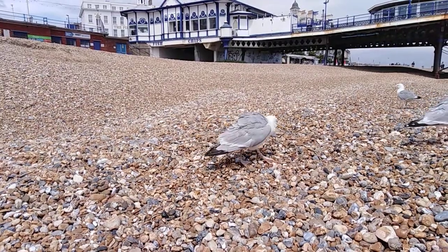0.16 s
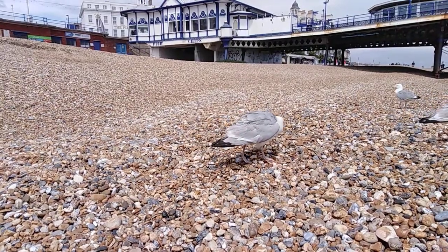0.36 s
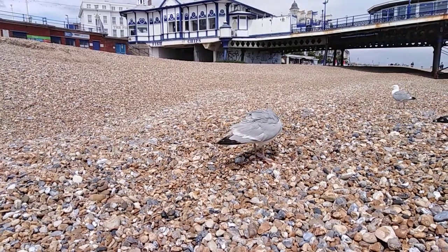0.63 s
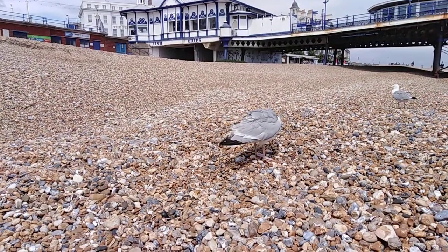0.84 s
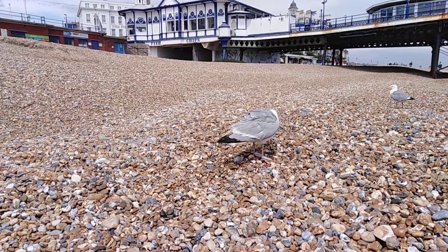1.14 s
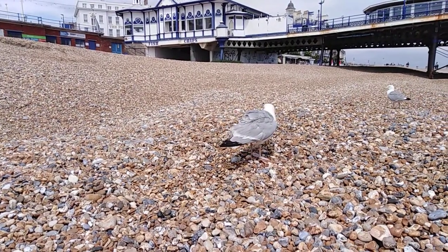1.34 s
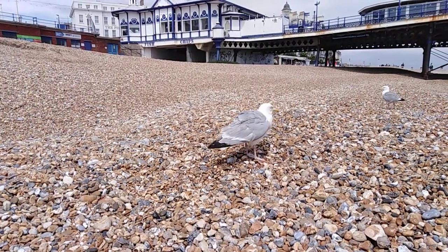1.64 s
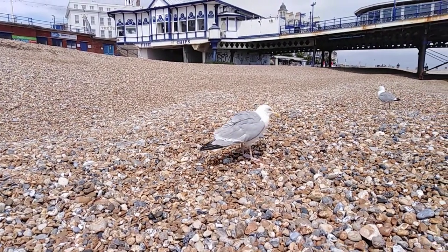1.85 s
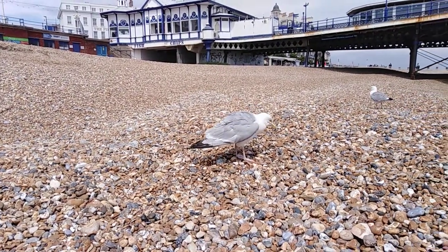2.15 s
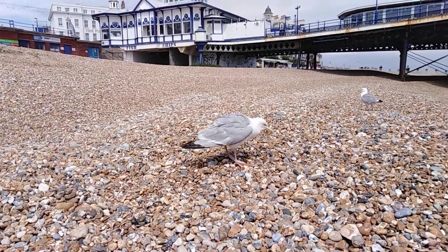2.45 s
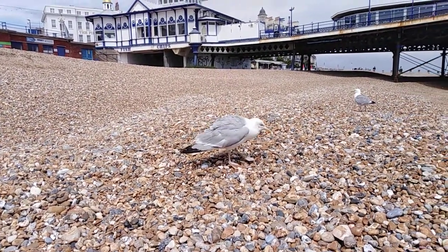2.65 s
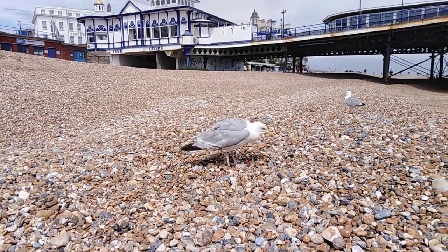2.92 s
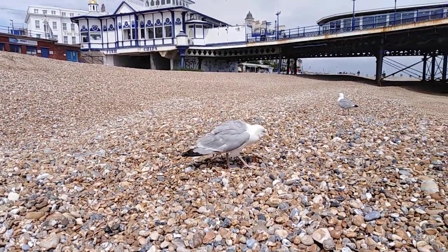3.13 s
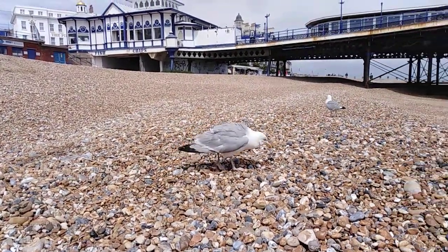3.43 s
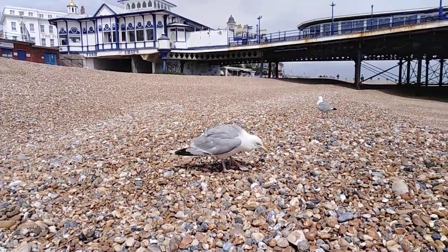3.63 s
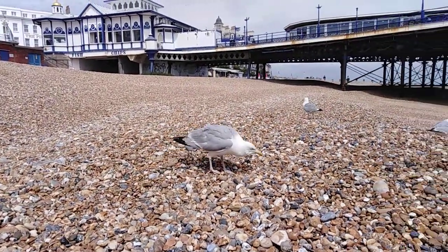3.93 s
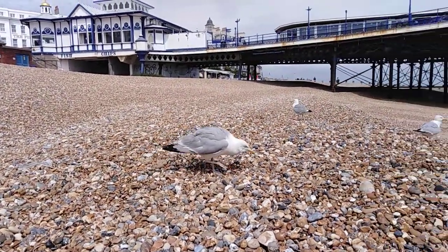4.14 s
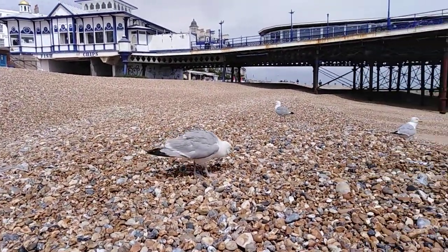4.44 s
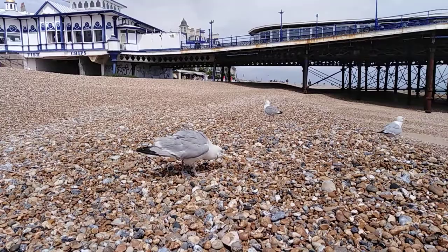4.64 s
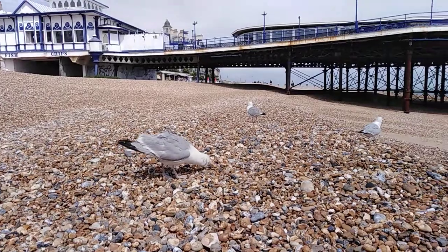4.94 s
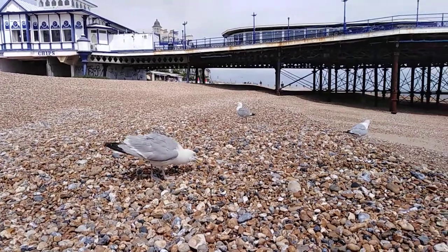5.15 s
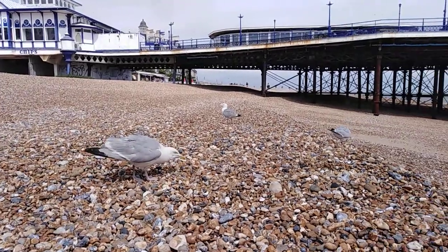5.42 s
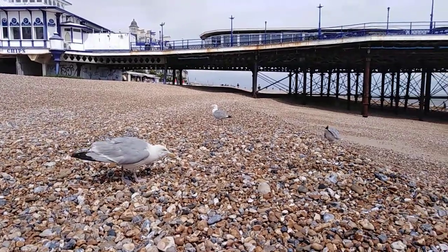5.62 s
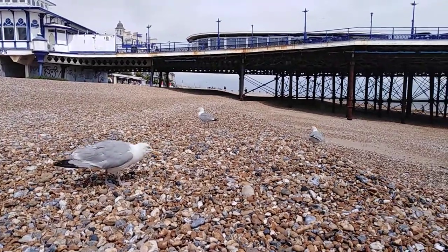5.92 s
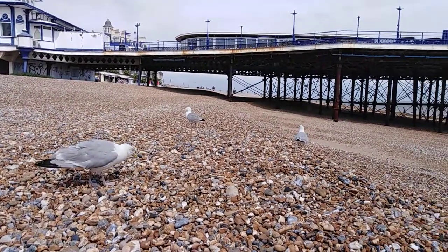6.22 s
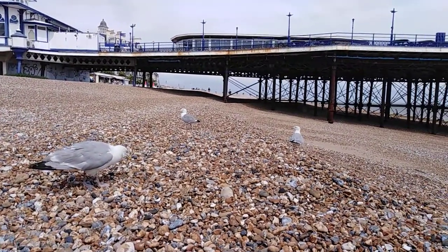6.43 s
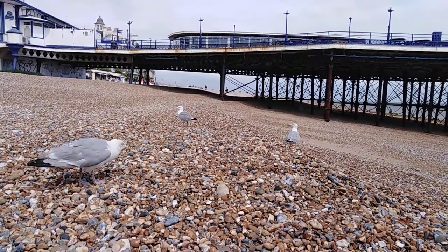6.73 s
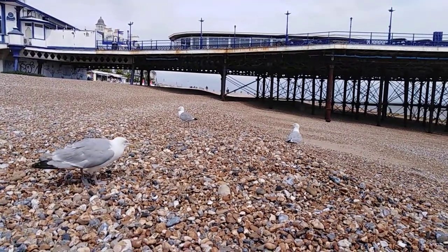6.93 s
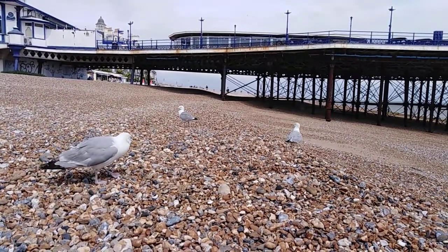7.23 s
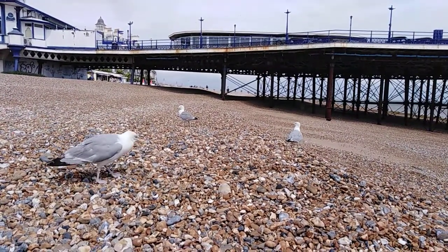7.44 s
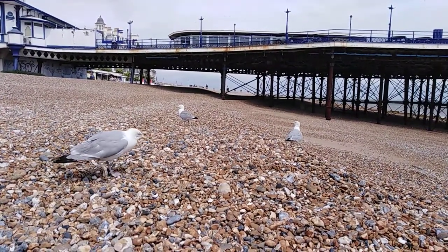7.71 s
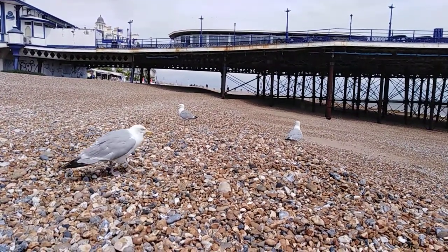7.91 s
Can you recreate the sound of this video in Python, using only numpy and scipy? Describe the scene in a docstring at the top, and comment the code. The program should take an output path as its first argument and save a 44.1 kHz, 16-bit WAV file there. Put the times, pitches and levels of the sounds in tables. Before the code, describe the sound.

Close stereo microphone on an open pebble beach. Wind rumble swells around one second and again past five, first on both sides, then mostly left. A shrill gull squeal breaks upward and slides down at the start, with two quieter returns. Distant mews give way to short rhythmic yelps. Dry stone knocks and small crunches punctuate a soft, even wash of surf.

```python
"""Gulls on a shingle beach

Two microphone ports on the shingle: a young gull whistles three times, a voice leaping between held pitches.
Far adults mew and yelp in harmonics; pebbles close by knock (ringing bursts) and crunch (dense grains).
Distant surf is filtered noise in slow swells; gusts are low rumble, with strong eddies, each placed at one port.
The left port hears the whistle, mews, surf and crunch a fraction of a millisecond after the right.
"""
import sys
import numpy as np
from scipy import signal
from scipy.fft import rfft, irfft, next_fast_len
from scipy.io import wavfile
from scipy.ndimage import uniform_filter1d

SR = 44100
rng = np.random.default_rng(int(sys.argv[2]) if len(sys.argv) > 2 else 0)


def how_loud(loudness_db):
    """Turn decibels into a plain amplitude multiplier (0 dB gives 1, 20 dB gives 10)."""
    steps = np.asarray(loudness_db, float) / 20
    return 10 ** steps


def wrap_up_sound(samples):
    """Save the sound to the file named by the first command line argument, as 16-bit audio."""
    columns = np.atleast_2d(samples).T
    # keep every value between -1 and 1, then stretch to whole-number steps
    tamed = np.clip(columns, -1, 1)
    steps = np.round(tamed * 32767).astype(np.int16)
    wavfile.write(sys.argv[1], SR, steps)


N = 355887

# Levels of the sources are those ahead of the port balance and the microphone.
# Young gull: one list a whistle, one row a step between windpipe resonances
# (start t/s, first f/Hz, last f/Hz, first level/dB, last level/dB)
WHISTLE_STEPS = [
    [(.314, 3430, 3167, -37.5, -44), (.35, 4100, 3995, -33.5, -56.5), (.402, 5060, 5320, -27.5, -31),
     (.426, 5655, 5510, -31.5, -38.5), (.556, 5150, 4920, -28, -38.5), (.716, 4365, 4130, -30.5, -48),
     (.822, 3640, 3390, -45.5, -54.5), (.854, 2890, 2940, -47, -76)],
    [(3.612, 4590, 4650, -45, -56.5), (3.674, 5200, 5410, -41, -42), (3.71, 5400, 4950, -46, -47.5),
     (3.94, 4610, 4380, -46, -60)],
    [(6.02, 2950, 2927, -53, -52.5), (6.038, 3646, 3360, -48.5, -52), (6.058, 3403, 3344, -50, -57),
     (6.088, 4260, 4240, -50.5, -54), (6.124, 5280, 5470, -41, -66), (6.156, 5780, 5590, -45.5, -56),
     (6.214, 5260, 4980, -42.5, -58), (6.378, 4480, 4230, -42, -47), (6.508, 4200, 3960, -55, -61)],
]
# End of each whistle (t/s)
WHISTLE_ENDS = [.874, 4.045, 6.54]
# Level shimmer of each whistle in gusty air (rms/dB)
WHISTLE_SHIMMER = [1.8, 5, 2.8]
# Overtones of the whistle, relative to the fundamental (f/Hz, level/dB)
WINDPIPE = [(6000, -15), (6700, -19.5), (8100, -12.5), (8700, -53), (10200, -35.5), (11300, -26),
            (12100, -45), (13000, -30), (15000, -68)]
# Hoarse second voice under the high notes, one list a whistle (t/s, f/Hz, level/dB)
HOARSE_VOICE = [
    [(.418, 4500, -51), (.45, 4800, -52), (.51, 4740, -55), (.53, 4630, -51), (.6, 4410, -52.5),
     (.675, 4190, -56.5), (.71, 4070, -59)],
    [(3.61, 4050, -60), (3.68, 4260, -58)],
    [(6.158, 4750, -65), (6.175, 4800, -60), (6.21, 4620, -67), (6.25, 4300, -62), (6.3, 4410, -59),
     (6.345, 4280, -62), (6.38, 4000, -60)],
]
# Broken squeaks of the second voice near the start of a whistle (t/s, f/Hz, level/dB)
SQUEAKS = [
    [(.305, 4200, -54), (.322, 4640, -46.5)],
    [(.33, 4940, -47), (.352, 4880, -45)],
    [(.375, 4700, -46.5), (.405, 4600, -38)],
    [(.403, 4310, -41.5), (.42, 4500, -44)],
    [(.39, 4950, -52), (.405, 5050, -52)],
    [(6.075, 4600, -64), (6.1, 4500, -63)],
    [(6.095, 4600, -64), (6.128, 5100, -47)],
    [(6.125, 4460, -50.5), (6.16, 4700, -65)],
]
# Colour of the whistle's echoes, duller than the voice (f/Hz, level/dB)
ECHO_COLOUR = [(4400, -18), (5800, -22)]
JUMP_S, SLIDE_S = 0.0029, 0.018  # time from one step to the next: a break, or a slide down
SLIDE_ABOVE_DB = -43  # a step must end louder than this to slide
SAG_POWER, SWELL_S, SWELL_DB = 1.4, 0.018, -6  # bend of the pitch; each step swells in from SWELL_DB
BEAT_DB = -8.5  # rough strand relative to the hoarse voice

# Far gulls: long mews, one list a mew (t/s, f/Hz, level/dB)
FAR_MEWS = [
    [(.5, 1117, -60.5), (.58, 1012, -59), (.64, 894, -61.5)],
    [(1.33, 1288, -61), (1.38, 1254, -56.5), (1.6, 1258, -60), (1.65, 1235, -72), (1.674, 1150, -61),
     (1.78, 1126, -70)],
    [(2.04, 1291, -59.5), (2.1, 1271, -59.5), (2.364, 1296, -56.5), (2.452, 1120, -67), (2.5, 1055, -72)],
]
# Throat of a mewing gull, shaping its harmonics (f/Hz, level/dB)
MEW_THROAT = [(1300, 0), (2500, -3), (3100, -30), (3500, 2), (3780, -14), (3880, -32)]
# Far string of short falling yelps (t/s, level/dB, f/Hz)
FAR_YELPS = [(2.42, -70, 1188), (2.86, -65.5, 1134), (2.961, -55.5, 1094), (3.119, -76, 1090),
             (3.222, -60.5, 1054), (3.35, -66, 1086), (3.467, -63, 1100), (3.62, -71, 1110),
             (3.753, -64, 1136), (3.897, -78, 1080), (4.038, -59.5, 1096), (4.211, -80, 1070),
             (4.32, -55.5, 1112), (4.469, -62.5, 1143), (4.617, -60.5, 1155), (4.852, -58, 1125),
             (4.957, -60, 1109)]
# Harmonics 1 to 3 of a yelp (level/dB)
YELP_HARMONICS = [-1, -27, -4.5]
MEW_LEAD_MS = 0.18  # the mews come from further left than the surf

# Pebbles knocked together (t/s, peak level/dB, left-right level/dB)
KNOCKS = [(0.1958, -39.5, -24), (1.032, -40.5, -17), (1.1897, -21.5, 8), (2.6034, -32.5, -7),
          (2.7567, -39, -8), (2.8583, -39, -13), (2.883, -37, -10), (2.9125, -29.5, -11),
          (3.059, -36.5, -14), (3.457, -22, -10), (3.6034, -31, 13), (3.8199, -42, -14), (3.981, -32, -19),
          (4.151, -35, -15), (4.2808, -39.5, -14), (4.402, -49, -22), (4.559, -29, -13), (4.5865, -30, 4),
          (4.728, -45, -3), (4.754, -46.5, -26), (4.833, -38.5, -18), (4.884, -33.5, -16),
          (4.9578, -38, -14), (5.0233, -35.5, -6), (5.064, -37, -10), (5.14, -39, -4), (5.284, -31, -13),
          (5.816, -46.5, -22.5), (5.8608, -30.5, -14), (6.534, -49, -4), (6.5998, -41.5, -25),
          (6.7488, -29.5, -2), (6.753, -42, -2), (6.764, -34, -8), (6.776, -48, -4), (6.867, -36.5, -6),
          (6.957, -34, -12.5), (7.2525, -43, -18), (7.3694, -36.5, -12), (7.8182, -37, -5.5)]
# Feet shifting the shingle (t/s, level/dB, length/s)
SHUFFLES = [(0.244, -68.5, 0.19), (0.628, -68.5, 0.11), (2.91, -56, 0.11), (3.43, -81, .05),
            (3.554, -65, 0.32), (3.839, -48.5, 0.048), (3.905, -48.5, 0.058), (4.043, -55, 0.12),
            (4.194, -66, 0.11), (4.42, -58.5, 0.084), (4.595, -52.5, 0.077), (5.02, -69, 0.4),
            (5.898, -70, 0.25), (6.278, -70.5, 0.16), (6.604, -63.5, 0.17), (6.764, -68.5, 0.09),
            (7.345, -72, .15), (7.832, -62, 0.038)]
# Colour of stone on stone (f/Hz, level/dB)
STONE = [(2500, -18), (4000, -8.5), (5500, -5.5), (7000, -10.5), (10000, -6), (13000, -6.5), (14300, -14.5),
         (15300, -49)]
RATTLE_DB, RATTLE_GROWTH = -54, 0.4  # rattle of a -36 dB knock; dB of rattle per dB of knock
BOUNCE_S, BOUNCE_DB = 0.008, -16.5  # scale of the bounce waits; mean level of a bounce under its knock
SETTLING_DB, SHUFFLE_RISE = -80, 0.65  # shingle at rest; rise time as a share of the length

# Distant surf (t/s, wash level/dB, fizz level/dB, level/dB of the surf's middle band, 1.4 to 1.7 kHz)
SURF_LEVELS = [(0, -56.5, -67, -84), (.5, -57, -73, -92.5), (1.0, -57.5, -71, -88), (1.4, -58, -67.5, -95),
               (2.2, -57, -68, -81), (2.55, -56, -66, -90), (2.85, -56, -67.5, -77), (3.2, -54, -64.5, -90),
               (4.1, -55, -67.5, -69.5), (4.5, -56, -71, -67.5), (5.2, -56, -70.5, -66.5),
               (5.55, -56.5, -68, -63.5), (5.9, -57, -71.5, -64.5), (6.35, -57, -67, -64.5),
               (6.6, -56.5, -72.5, -66), (7.2, -56.5, -67.5, -62.5), (8.07, -56, -71.5, -64.5)]
# Density of each surf layer when its level is 0 (f/Hz, level/dB per Hz)
WASH_COLOUR = [(25, -29), (50, -18), (90, -17), (140, -15), (250, -17.5), (500, -23), (900, -26.5),
               (1250, -28), (1450, -30.5), (1900, -28.5), (2550, -30), (2900, -31.5), (5500, -40),
               (14000, -56)]
FIZZ_COLOUR = [(2900, -56.5), (3200, -21), (3450, -23), (3750, -30), (4300, -26.5), (4900, -29),
               (5500, -39.5), (8000, -53.5)]
MIDDLE_COLOUR = [(1150, -51.5), (1400, -20.5), (1650, -22.5), (1850, -44.5)]

# Slow rise and fall of the wind rumble (t/s, left level/dB, right level/dB)
GUSTS = [(0, -69, -50), (.5, -55, -39), (.8, -44.5, -47.5), (1.05, -38.5, -35.5), (1.6, -50, -41),
         (2.0, -49.5, -51), (2.6, -54, -54.5), (3.2, -72, -56.5), (3.75, -63, -58), (4.3, -64.5, -53.5),
         (4.75, -58, -39), (5.0, -43, -46), (5.25, -49.5, -35.5), (5.75, -34, -44), (6.0, -37.5, -53.5),
         (6.25, -51.5, -44.5), (6.7, -72, -58), (7.15, -64, -78), (7.5, -79, -44.5), (8.07, -82, -55)]
# Strongest eddies (t/s, level/dB, length/s, port: 0 left, 1 right)
BUFFETS = [(0.022, -33.5, 0.05, 1), (0.373, -33, 0.012, 1), (0.624, -33.5, 0.027, 0),
           (0.802, -33.5, 0.011, 1), (0.903, -31, 0.035, 1), (0.96, -26, 0.012, 1),
           (1.046, -23.5, 0.015, 1), (1.077, -23.5, 0.035, 0), (1.132, -27, 0.028, 0),
           (1.217, -33.5, 0.021, 0), (1.282, -33, .055, 1), (1.286, -32, 0.03, 0), (1.361, -33.5, 0.027, 0),
           (1.402, -33, 0.025, 1), (1.744, -36, 0.028, 1), (1.884, -36, 0.041, 1), (2.211, -34, 0.014, 1),
           (2.389, -32, 0.075, 1), (2.471, -31.5, 0.0069, 0), (2.474, -31, 0.032, 1),
           (4.391, -38.5, 0.034, 0), (4.735, -40, 0.079, 1), (4.964, -20.5, 0.029, 0),
           (5.069, -25.5, 0.055, 0), (5.153, -25.5, 0.02, 0), (5.259, -33, 0.03, 1), (5.354, -23, 0.089, 0),
           (5.508, -19.5, 0.0069, 0), (5.554, -30, 0.056, 0), (5.916, -26, 0.014, 0),
           (5.964, -29.5, 0.016, 0), (6.112, -34, 0.066, 0), (6.183, -33, 0.073, 1), (6.235, -32, 0.11, 0),
           (6.312, -34.5, 0.018, 0), (6.462, -38, 0.12, 0)]
# Spectral shape of the rumble (f/Hz, level/dB)
EDDY_COLOUR = [(25, -39), (50, -9), (80, 9.5), (130, 2), (200, -2.5), (350, -24.5), (600, -36.5),
               (1200, -37.5)]
# Spectral shape of the sharper edge of strong eddies (f/Hz, level/dB)
GUST_EDGE = [(60, -36), (150, 3), (250, -5.5), (450, -13.5), (800, -30), (1500, -42)]

# Likeness of left and right in spread sounds (f/Hz, share)
LIKENESS = [(100, 1), (300, 1), (600, 1), (1400, 0.6), (2500, 0.73), (4500, 0.16), (9000, 0.018)]
# Time by which the left port follows the right (f/Hz, lag/ms)
PORT_LAG = [(130, 0.09), (300, 0.37), (600, 0.32), (1400, 0.34), (2500, 0.4646)]
# Balance of the ports (f/Hz, left-right level/dB)
PORT_LEAN = [(200, 0.5), (1000, -0.5), (1900, 4.5), (2700, 0.5), (4300, 5.5), (6500, 2.5), (10000, -8),
             (14000, -4.5)]
# Bass cut of the microphone (f/Hz, level/dB)
BASS_CUT = [(20, -36), (40, -9.5), (60, -0.5), (90, 0.5)]
# Level under which a narrow band drops away (f/Hz, level/dB)
DROP_LEVEL = [(200, -116), (1000, -73), (1450, -70.5), (2200, -74), (3100, -72), (3800, -74), (4500, -77.5),
              (5200, -78), (6500, -82), (8000, -84.5), (10000, -85), (14000, -89.5)]
# Gain of a dropped band that no loud neighbour masks (f/Hz, level/dB)
DROP_GAIN = [(900, -21), (1450, -25), (2200, -21), (3050, -33), (3400, -24), (3800, -30), (4400, -18),
             (5000, -19), (5600, -26), (7000, -20)]


def young_gull():
    """A clean whistle, stronger at the left port; a weaker hoarse voice under it makes the high notes rough."""
    whistles = [stairs(steps, end) for steps, end in zip(WHISTLE_STEPS, WHISTLE_ENDS)]
    clean = sum(tone(w, lambda k, hz: read(WINDPIPE, hz) * (k > 1), jitter=0.0022, shimmer_db=db)
                for w, db in zip(whistles, WHISTLE_SHIMMER))
    hoarse = sum(strand(h, jitter=0.0099, shimmer_db=2.5) for h in HOARSE_VOICE)
    # only the first and third whistles beat
    beats = sum(strand(beat_rows(w, h), jitter=0.044, shimmer_db=3.5)
                for w, h in zip(whistles[::2], HOARSE_VOICE[::2]))
    squeaks = sum(strand(s, jitter=0.014, shimmer_db=2) for s in SQUEAKS)
    voice = clean + hoarse + beats + squeaks
    direct = ports(voice, 0 * voice, np.ones_like) * how_loud([[1.5], [-2.5]])
    return direct + scatter(colour(voice, ECHO_COLOUR), t60=0.33)


def stairs(steps, end):
    """Turns steps into a pitch and level curve: swell in, bend (mostly a quickening sag), break or slide."""
    stops = []
    for step, following in zip(steps, steps[1:]):
        slides = following[1] < step[2] and step[4] > SLIDE_ABOVE_DB
        stops.append(following[0] - (SLIDE_S if slides else JUMP_S))
    rows = []
    for (s, hz, last_hz, db, last_db), stop in zip(steps, stops + [end]):
        u = np.linspace(0, 1, num=9)
        bend = u ** SAG_POWER if last_hz < hz else 1 - (1 - u) ** SAG_POWER
        swell_db = SWELL_DB * np.exp(-u * (stop - s) / SWELL_S)
        rows += zip(s + u * (stop - s), hz + (last_hz - hz) * bend, db + (last_db - db) * u + swell_db)
    return rows


def beat_rows(whistle, hoarse):
    """Two voices beat: a strand lies as many Hz under the hoarse voice as that lies under the whistle."""
    s, whistle_hz = np.transpose(whistle)[:2]
    return [(t, 2 * hz - np.interp(t, s, whistle_hz), db + BEAT_DB) for t, hz, db in hoarse]


def strand(rows, jitter, shimmer_db):
    """A voice of one partial, without overtones."""
    return tone(rows, lambda k, hz: 0, jitter, count=1, shimmer_db=shimmer_db)


def tone(rows, harmonic_db, jitter, count=3, shimmer_db=1.6):
    """Harmonics on a pitch curve, slightly unsteady; the voice breaks off where the pitch leaps."""
    s, hz, db = np.transpose(rows)
    t, out = np.arange(s[0], s[-1], 1 / SR), np.zeros(N)
    pitch = np.interp(t, s, hz)
    leap = np.gradient(pitch) * SR / 70000  # 1 at 70000 Hz per second
    held = uniform_filter1d(np.exp(-leap ** 2), size=90)
    turns = np.cumsum(pitch * (1 + jitter * slow(300, len(t)))) / SR
    voice = sum(how_loud(harmonic_db(k, k * pitch)) * np.cos(2 * np.pi * k * turns) for k in range(1, count + 1))
    flutter_db = shimmer_db * slow(45, len(t))  # gusty air makes the level shimmer
    fade = np.clip(np.minimum(t - s[0], s[-1] - t) / 0.005, 0, 1)
    level = np.sqrt(2) * how_loud(np.interp(t, s, db) + flutter_db)
    out[round(s[0] * SR):][:len(t)] = level * voice * held * fade
    return out


def far_gulls():
    """Adults at a distance, blurred by echoes; the yelps lean to the right port."""
    mews, yelps = far_mews(), far_yelps()
    direct = ports(mews, 0 * mews, np.ones_like, MEW_LEAD_MS) + yelps * how_loud([[-3], [3]])
    return direct + how_loud(-5) * scatter(mews + yelps, t60=0.35)


def far_mews():
    """Long mews: three harmonics shaped by the throat."""
    return sum(tone(m, lambda k, hz: read(MEW_THROAT, hz), jitter=0.0033, shimmer_db=0.1) for m in FAR_MEWS)


def far_yelps():
    """Short yelps: three harmonics, each note falling in pitch."""
    shape = [(0, 1.03, -5), (0.025, 1, 0), (0.075, 0.92, -7)]  # one yelp: (t/s, pitch share, level/dB)
    notes = [[(s + u, share * hz, db + fall_db) for u, share, fall_db in shape] for s, db, hz in FAR_YELPS]
    return sum(tone(note, lambda k, hz: YELP_HARMONICS[k - 1], jitter=0.007) for note in notes)


def pebbles():
    """Close single knocks over the crunch of shifting shingle."""
    return colour(knocks(), STONE) + ports(*patchy(crunch(), patch_db=2.5), lambda hz: read(LIKENESS, hz))


def knocks():
    """A struck pebble cracks and rings in four modes, bounces twice and leaves a longer rattle."""
    t = np.arange(3000) / SR
    out = np.zeros((2, N + len(t)))
    noises, draws = rng.standard_normal((len(KNOCKS), len(t))), rng.random((len(KNOCKS), 8))
    for (s, db, pan_db), noise, d in zip(KNOCKS, noises, draws):
        modes = sum(np.sin(2 * np.pi * 4500 * 3 ** u * t) for u in d[:4])  # 4.5 to 13.5 kHz
        ring = modes * how_loud(-11 - 60 * t / 0.0072)
        crack = how_loud(3) * (t == 0) + noise * how_loud(-4 - 60 * t / 0.004) + ring
        waits = np.round(np.cumsum(BOUNCE_S * (0.37 + 1.6 * d[4:6])) * SR).astype(int)
        bounces = sum(how_loud(BOUNCE_DB * (0.5 + u)) * np.roll(crack, w) for w, u in zip(waits, d[6:]))
        rattle_db = RATTLE_DB + RATTLE_GROWTH * (db + 36) - db  # relative to the knock
        blow = crack + bounces + noise * how_loud(rattle_db - 60 * t / 0.22)
        out[:, round(s * SR):][:, :len(t)] += how_loud(db + np.array([[0.5], [-0.5]]) * pan_db) * blow
    return out[:, :N]


def crunch():
    """Dense small grains: noise lifted by random ticks that each die in a few ms."""
    ticks = (rng.random(N) < 900 / SR) * how_loud(3.2 * np.minimum(rng.exponential(1, N), 4))  # 900 a second
    density = 0.5 + signal.lfilter([1], [1, -np.exp(-1 / (0.002 * SR))], ticks)
    grains = rng.standard_normal((2, N)) * density * how_loud(1.5 * slow(40, N))
    return evened(colour(grains, STONE)) * shuffling()


def shuffling():
    """Level of the shingle: each shuffle swells quickly and settles more slowly."""
    t = np.arange(0, N, 64) / SR
    level = how_loud(SETTLING_DB)
    for s, db, length in SHUFFLES:
        u = (t - s) / np.where(t < s, SHUFFLE_RISE * length, length)
        level = level + how_loud(db) * np.exp(-u ** 2)
    return np.interp(np.arange(N) / SR, t, level)


def surf():
    """Distant waves: a broad wash, a brighter fizz that swells more, a middle band that grows later on."""
    noise = rng.standard_normal((3, 2, N)) * np.sqrt(SR / 2)  # 0 dB per Hz
    layers = zip(noise, (WASH_COLOUR, FIZZ_COLOUR, MIDDLE_COLOUR))
    both = sum(colour(n, c) * how_loud(follow(SURF_LEVELS, k)) for k, (n, c) in enumerate(layers, start=1))
    return ports(*patchy(both, patch_db=1.3043), lambda hz: read(LIKENESS, hz))


def wind():
    """Lumpy low rumble, its noise unrelated at the two ports; strong eddies gain a sharper edge."""
    level = gust_level()
    rumble = evened(colour(rng.standard_normal((2, N)), EDDY_COLOUR))
    power = uniform_filter1d(uniform_filter1d(rumble ** 2, size=900), size=900)
    rumble /= np.sqrt(power + 0.036)  # an eddy keeps its strength
    edge = evened(colour(rng.standard_normal((2, N)), GUST_EDGE))
    return colour(level * rumble + how_loud(6) * level ** 1.5 * edge, [(1200, 0), (2500, -70)])


def gust_level():
    """Wind level at each port: a wandering base plus bursts that rise faster than they fall."""
    t = np.arange(N) / SR
    level = how_loud([follow(GUSTS, 1), follow(GUSTS, 2)] + 5.15 * slow(7.4, (2, N)))
    for s, db, length, port in BUFFETS:
        near = slice(max(round((s - 0.2) * SR), 0), round((s + 0.2) * SR))
        u = (t[near] - s) / length
        level[int(port), near] += how_loud(db) * np.exp(-np.where(u < 0, 4.0, 2.5) * u ** 2)
    return level


def ports(direct, other, same, lead_ms=0):
    """Left hears a delayed blend of the direct sound and an unrelated one; the housing tilts the balance."""
    size = next_fast_len(N + 4096)
    hz = np.fft.rfftfreq(size, 1 / SR)
    likeness = np.clip(same(hz), 0, 1)
    lean = how_loud(read(PORT_LEAN, hz) / 2)
    right = rfft(direct, size)
    blend = likeness * right + np.sqrt(1 - likeness ** 2) * rfft(other, size)
    left = blend * np.exp(-2j * np.pi * hz * (read(PORT_LAG, hz) - lead_ms) / 1000)
    return irfft(np.array([left * lean, right / lean]), size)[:, :N]


def scatter(x, t60):
    """Diffuse echoes, unrelated left and right; they die by 60 dB in t60 seconds."""
    t = np.arange(SR // 2) / SR
    tail = rng.standard_normal((2, len(t))) * how_loud(-60 * t / t60) * np.minimum(t / 0.0053, 1)
    return signal.fftconvolve(x[None], tail / np.linalg.norm(tail[0]), axes=1)[:, :N]


def patchy(x, patch_db):
    """Random patches, about 300 Hz by 100 ms, louder and softer."""
    z = signal.stft(x, nperseg=1024, noverlap=768)[2]
    patches = uniform_filter1d(rng.standard_normal(z.shape[1:]), size=7, axis=0)
    patches = evened(uniform_filter1d(patches, size=17, axis=1))
    return signal.istft(z * how_loud(patch_db * patches), nperseg=1024, noverlap=768)[1][:, :N]


def colour(x, points):
    """Filters by a spectrum in dB."""
    size = next_fast_len(N + 4096)
    gain = how_loud(read(points, np.fft.rfftfreq(size, 1 / SR)))
    return irfft(rfft(x, size) * gain, size)[..., :N]


def read(points, hz):
    """Reads a spectrum on a log-frequency axis."""
    f, value = np.transpose(points)
    return np.interp(np.log(hz + 1), np.log(f + 1), value)


def follow(rows, column):
    """One column of a curve, sample by sample."""
    return np.interp(np.arange(N) / SR, np.array(rows)[:, 0], np.array(rows)[:, column])


def slow(hz, shape):
    """Noise that wanders about hz times a second, rms 1."""
    width = int(SR / hz)
    return evened(uniform_filter1d(uniform_filter1d(rng.standard_normal(shape), width), width))


def evened(x):
    """Scales to rms 1."""
    return x / np.sqrt(np.mean(x ** 2) + 1e-20)


def dropped_bands(x):
    """Weak narrow bands, and those masked by a loud band below them, drop away."""
    hz, _, z = signal.stft(x, SR, nperseg=1024, noverlap=768)
    middle, side = z.mean(0), (z[0] - z[1]) / 2
    power = uniform_filter1d(abs(middle) ** 2 + 0.5 * abs(side) ** 2, size=4, axis=0)
    # bands return fast and drop slowly
    smooth = abs(signal.lfilter([0.12], [1, -0.88], power, axis=1))
    power_db = 10 * np.log10(smooth + 0.12 * abs(power) + 1e-20)
    # a loud band masks those above it, less with each kHz
    slope = 2.5 * hz[:, None] / 1000
    mask_db = np.maximum.accumulate(power_db + slope, axis=0) - slope - 33
    limit_db = np.maximum(read(DROP_LEVEL, hz)[:, None], mask_db)
    keep = np.clip((power_db - limit_db) / 2.5, 0, 1)
    # masked bands drop deepest
    depth_db = read(DROP_GAIN, hz)[:, None] - 12 * np.clip((mask_db - power_db) / 6, 0, 1)
    return signal.istft(z * how_loud(depth_db * (1 - keep)), SR, nperseg=1024, noverlap=768)[1][:, :N]


def scene():
    """All sources at the two ports."""
    return young_gull() + far_gulls() + pebbles() + surf() + wind()


def low_pass(x):
    """Removes everything above the highest recorded frequency."""
    return signal.sosfilt(signal.butter(12, 15480, fs=SR, output="sos"), x)


def record(dry):
    """The microphone cuts the bass; weak and masked bands drop away."""
    mix = dropped_bands(colour(dry, BASS_CUT))
    return low_pass(mix)


dry = scene()
out = record(dry)
wrap_up_sound(out)
```